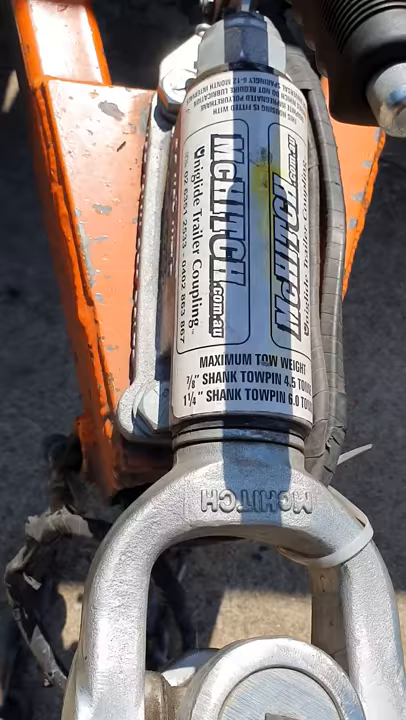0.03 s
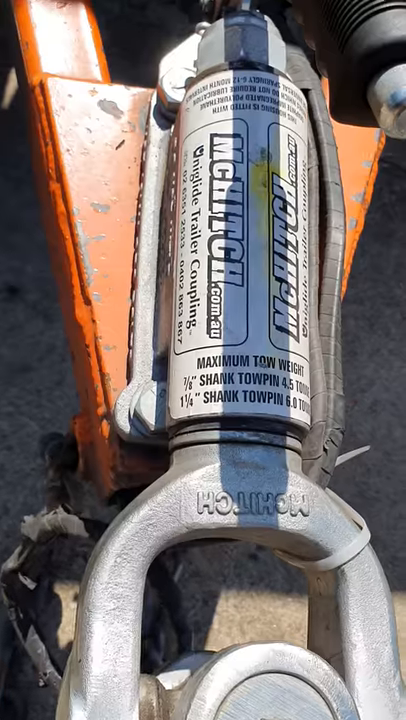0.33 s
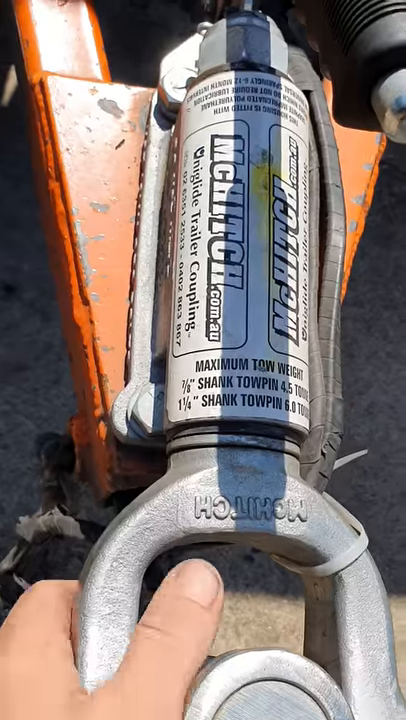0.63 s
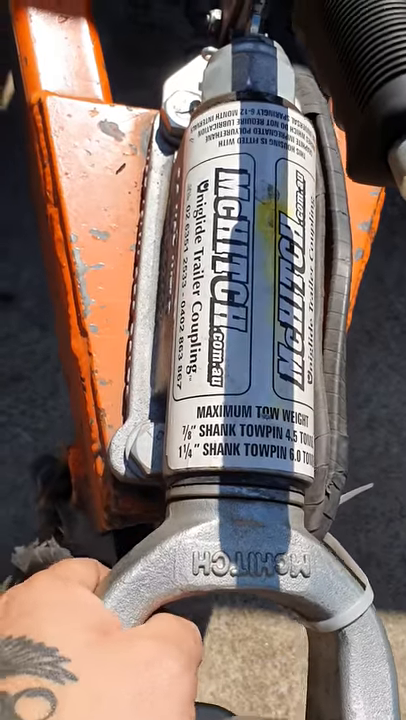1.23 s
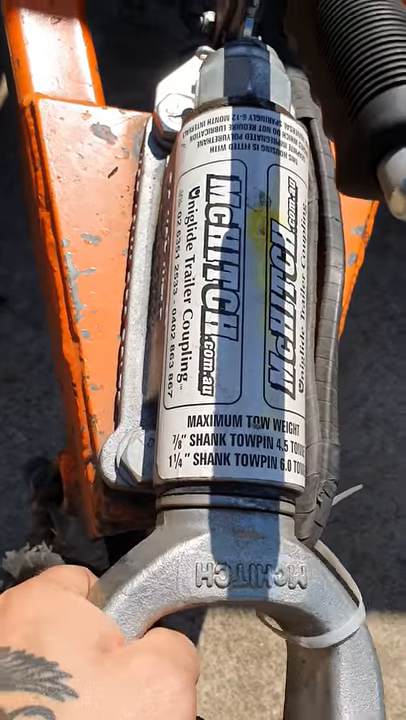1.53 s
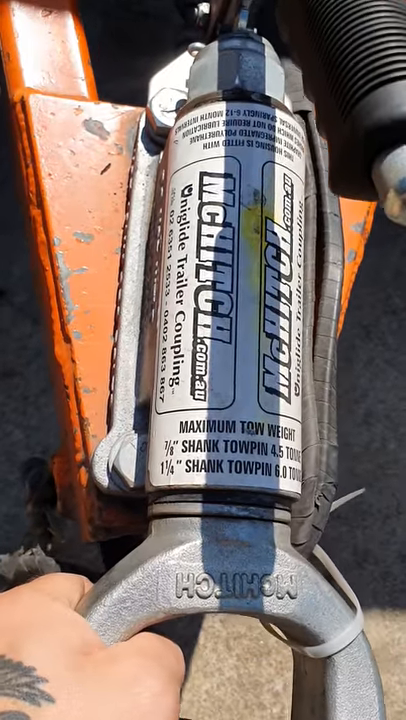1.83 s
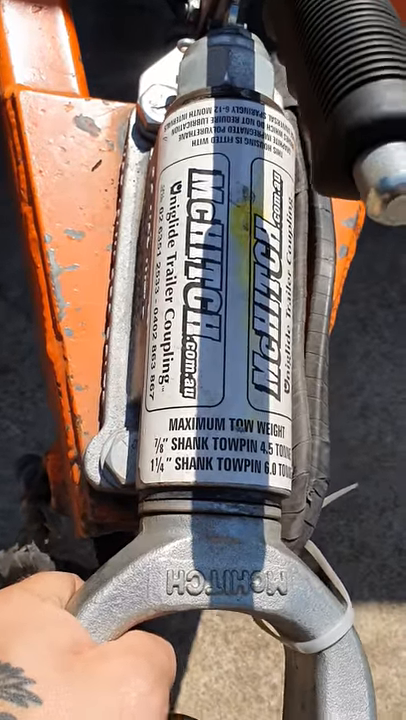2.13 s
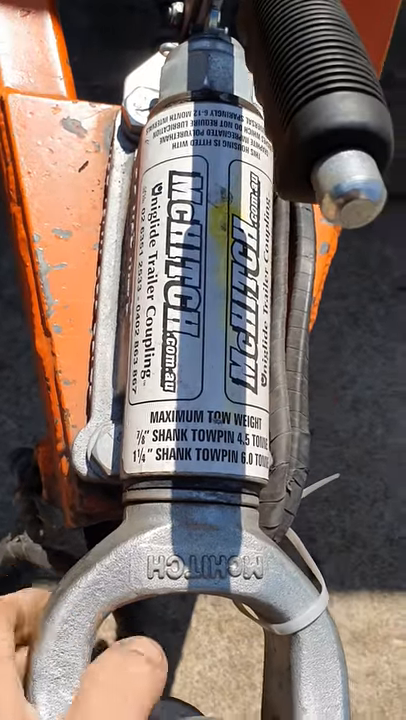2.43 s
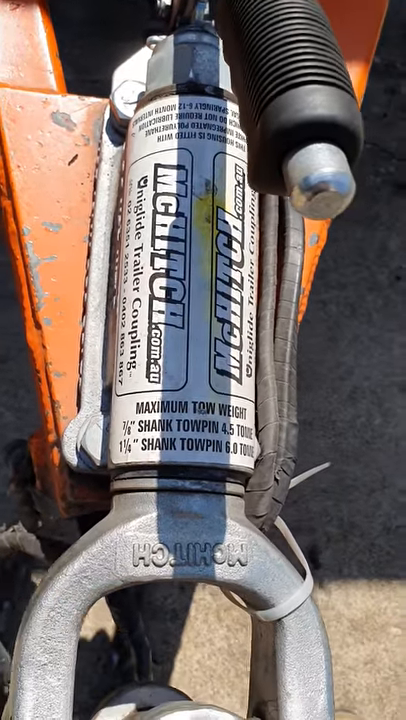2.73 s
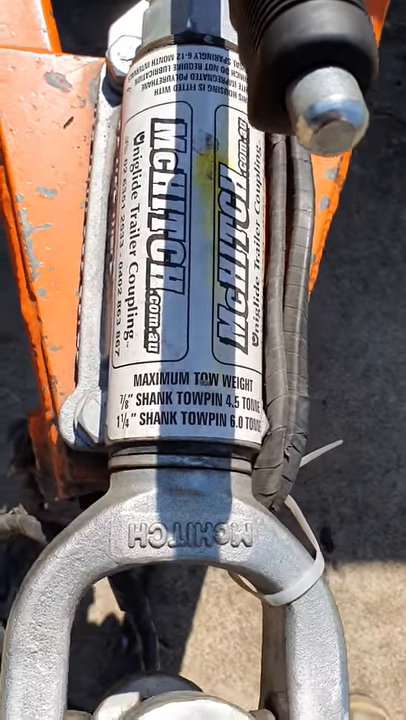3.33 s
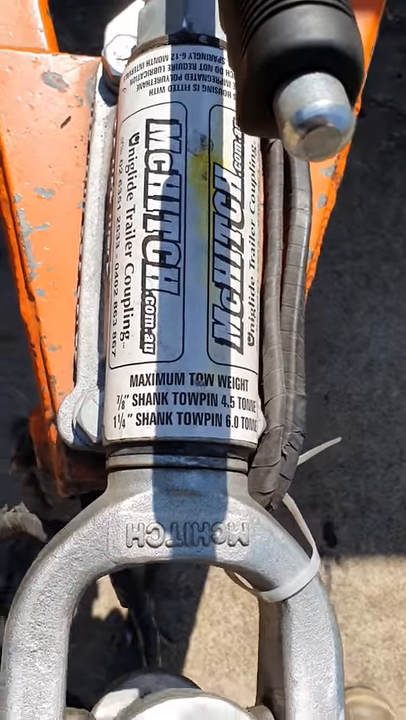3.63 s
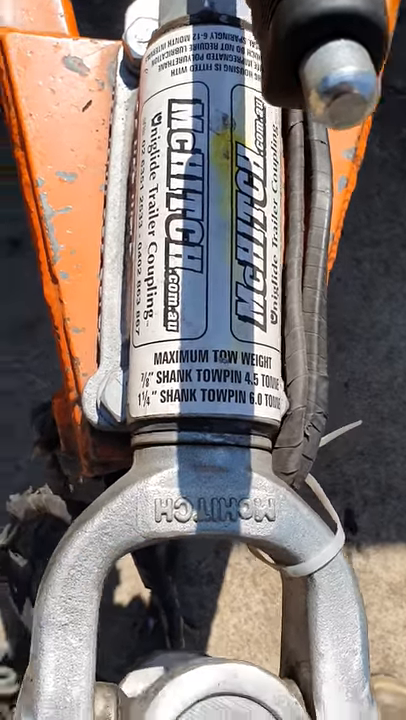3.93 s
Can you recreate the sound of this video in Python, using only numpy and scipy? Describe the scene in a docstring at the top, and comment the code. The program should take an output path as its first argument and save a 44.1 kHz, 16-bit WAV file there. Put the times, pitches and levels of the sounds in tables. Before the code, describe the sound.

A steel trailer coupling knocks three times with a dull, ringing clunk. Before that, an engine idles outdoors with buzzing loose parts while a hand softly bumps and brushes the metal close to the microphone.

```python
"""A four-cylinder engine idles outdoors: it hums and clatters, and loose parts buzz once a cycle.
Close by, a hand grips the yoke of a steel trailer coupling and slides off: soft bumps, hiss of skin.
Then the load shifts: the frame rumbles and the coupling knocks three times. Each knock is a dull
clunk as the slack closes, a spray of small contacts that ring the steel, and a ringing drawbar."""
import sys
import numpy as np
from scipy import signal
from scipy.fft import rfft, irfft
from scipy.io import wavfile
from scipy.ndimage import uniform_filter1d

SR = 44100
rng = np.random.default_rng(int(sys.argv[2]) if len(sys.argv) > 2 else 0)


def waveform_to_disk(signal):
    """Save audio, clipped to [-1, 1], as 16-bit WAV at the path in sys.argv[1]."""
    frames = np.transpose(np.atleast_2d(signal))
    scaled = np.clip(frames, -1, 1) * 32767
    samples = np.round(scaled).astype(np.int16)
    wavfile.write(sys.argv[1], SR, samples)


N = 176400
CYCLE_HZ = 6.667  # engine cycle, four firings each


def coupling():
    """The slack closes with a clunk; the joint rattles, drawbar and frame ring on."""
    # (time [s], clunk [dB], clunk [Hz], rattle [dB], rattle tilt [dB/octave], drawbar [dB])
    knocks = [(3.2242, -16.5, 670, -32, 0, -34), (3.2297, -7.5, 690, -20, -1, -21),
              (3.5234, -11.5, 690, -25, -1, -30), (3.89, -14.5, 642, -26.5, -1.5, -31.5)]  # the first two merge into one
    # (frequency [Hz], t60 [s], level [dB])
    drawbar_modes = [(160, 0.14, -5), (235, 0.3, -3), (306.5, .65, -4), (332.6, 1, -7), (509, 0.84, -15),
                     (690, 0.17, -4.5)]
    # (time [s], level [dB], frequency [Hz], width [s])
    frame_swings = [(3.30, -23.5, 310.8, 0.041), (3.575, -24.5, 243.5, .022), (3.935, -29, 254, 0.025)]
    # after-rattles as the joint settles (time [s], level [dB])
    settles = [(3.306, -47), (3.328, -44), (3.346, -47), (3.607, -44)]
    clunk_s, ring_rise_s = 0.003, 0.0065
    t, out = clock(), 0
    for start_s, clunk_db, hz, rattle_db, tilt_db, drawbar_db in knocks:
        age = t - start_s
        overtone = undb(-16) * thud(age, 1.93 * hz, clunk_s)
        thump = undb(-11) * thud(age, 0.467 * hz, 2 * clunk_s)
        clunk = thud(age, hz, clunk_s) + overtone + thump
        drawbar = -sum(undb(db) * swell(age, ring_rise_s, t60_s) * np.sin(2 * np.pi * mode_hz * age)
                       for mode_hz, t60_s, db in drawbar_modes)
        out = out + undb(clunk_db) * clunk + undb(drawbar_db) * drawbar
        out = out + undb(rattle_db) * rattle(start_s, tilt_db)
    swings = sum(undb(db) * thud(t - start_s, hz, width_s) for start_s, db, hz, width_s in frame_swings)
    return out + swings + sum(undb(db) * rattle(start_s, tilt_db=4) for start_s, db in settles)


def rattle(start_s, tilt_db):
    """Small steel contacts ring the coupling; the treble dies first, a faint tail lingers."""
    # (frequency [Hz], density [dB])
    spray_spectrum = [(200, -10), (600, 6.5), (1000, -3.5), (1400, 2), (1650, -3), (2300, 1), (3000, -3),
                      (4200, -5.5), (5500, -10.5), (8000, -14), (9700, -17), (11500, -15), (13000, -21.5),
                      (15500, -27)]
    # (frequency [Hz], t60 [s], level [dB])
    steel_modes = [(462, 0.23, 3.5), (1260, .08, -6), (1370, 0.06, -13), (1830, 0.2, 3.5),
                   (2080, 0.091, -15), (2080, 0.15, 4.5), (2220, 0.092, -2), (2480, 0.45, -17),
                   (2700, 0.061, 5.5), (3190, .15, -7), (3680, 0.25, -8), (4480, 0.11, -7),
                   (6350, 0.12, -20), (10700, 0.069, -8)]
    rise_s, split_hz, tail_corner_hz = 0.0066, 6800, 6000
    age, hz = clock() - start_s, np.fft.rfftfreq(N, 1 / SR)
    grain = np.exp(0.27 * unit(uniform_filter1d(rng.standard_normal(N), size=40)))
    tilt = undb(tilt_db * np.log2(np.maximum(hz / 2000, 1)))
    spray = rfft(reflect(noise(spray_spectrum)) * unit(grain)) * tilt
    lowpass = 1 / (1 + (hz / split_hz) ** 4)
    burst = swell(age, rise_s, t60_s=0.078)
    body = irfft(spray * lowpass) * swell(age, rise_s, t60_s=0.13)
    treble = irfft(spray * (1 - lowpass)) * burst
    tail = undb(-19) * irfft(spray / np.hypot(1, hz / tail_corner_hz)) * swell(age, rise_s, t60_s=1)
    steel = undb(-1) * ring(burst * rng.standard_normal((2, N)), steel_modes)
    return (body + treble + tail + steel) * pan(left_db=1.5)


def frame():
    """The frame rumbles as the load shifts."""
    # (time [s], level [dB])
    load_curve = [(3.0, -56), (3.122, -32.5), (3.21, -37), (3.259, -23.5), (3.36, -28), (3.46, -31),
                  (3.54, -25), (3.63, -26.5), (3.73, -29), (3.8, -30), (3.86, -35), (3.91, -29), (4.0, -32)]
    # (frequency [Hz], density [dB])
    rumble_spectrum = [(20, -25), (45, -4.5), (65, 2.5), (95, -6.5), (160, -2.5), (250, -6), (340, -6.5),
                       (420, -14.5), (560, -15), (800, -24.5), (1500, -24.5), (4000, -50)]
    time_s, db = np.array(load_curve).T
    return noise(rumble_spectrum) * undb(np.interp(clock(), time_s, db, left=-90))


def hand():
    """The hand bumps the yoke, skin brushes the steel, the palm scuffs as it lets go."""
    # (time [s], level [dB], frequency [Hz])
    bumps = [(0.854, -21, 88), (1.644, -26.5, 68.7), (1.727, -25, 63.7), (1.792, -25.5, 69),
             (2.164, -25, 71.3)]
    # (start [s], rise [s], length [s], level [dB])
    brushes = [(.415, 0.017, .27, -57.5), (2.15, 0.33, 1.15, -51.5)]
    # both (frequency [Hz], density [dB])
    brush_spectrum = [(1500, -14), (3000, 1), (4500, 4.5), (7500, -9), (9600, 4), (11000, -4.5),
                      (15500, -8)]
    scuff_spectrum = [(100, -3), (300, -2), (700, -6), (1200, -3), (2500, -12), (8000, -32)]
    scuff_at_s, scuff_width_s = 2.165, 0.053
    t, rub = clock(), 0
    thuds = sum(undb(db) * thud(t - start_s, hz, width_s=0.0086) for start_s, db, hz in bumps)
    scuff = undb(-43.5) * np.exp(-((t - scuff_at_s) / scuff_width_s) ** 2) * noise(scuff_spectrum)
    for start_s, rise_s, length_s, db in brushes:
        attack = np.clip((t - start_s) / rise_s, 0, 1)
        release = np.cos(np.pi / 2 * np.clip((t - start_s) / length_s, 0, 1))
        rub = rub + undb(db) * attack * release
    return thuds + scuff + rub * noise(brush_spectrum) * pan(left_db=-1)


def engine():
    """Firing hum, clatter that repeats each cycle, rush of fan and air; clatter and rush throb."""
    # (multiple of the firing rate, level [dB])
    harmonics = [(1, -50), (2, -1), (3, 0.5), (4, -3.5), (5, -20), (6, -16.5), (8, -5.5), (9, -9.5),
                 (13, -15.5), (19, -15.5)]
    # both (frequency [Hz], density [dB])
    clatter_spectrum = [(40, -9), (130, -6), (210, -2.5), (255, 2.5), (340, -4), (450, -8), (520, -3),
                        (680, -13), (1050, -4.5), (1300, -14.5), (1750, -5.5), (2400, -20.5), (3200, -28),
                        (6000, -38.5)]
    rush_spectrum = [(20, -6), (40, -19), (65, 3.5), (130, 2), (260, -6), (360, -3.5), (450, -8.5),
                     (750, -14), (1300, -15), (1800, -15), (2500, -12), (3000, -20), (4400, -18.5),
                     (5300, -21), (5800, -24), (9500, -29.5), (12000, -40), (15500, -63)]
    hum_db, clatter_db, rush_db, jitter_s = -43, -43, -42, 0.00014
    cycle_throb_db, firing_throb_db, throb_peak_s = 0.93, 0.5, 0.0596
    t = clock()
    late_s = jitter_s * unit(signal.resample(rng.standard_normal(64), N))
    cycles = CYCLE_HZ * (t + late_s)
    firings = 4 * cycles
    hum = sum(undb(db) * np.cos(2 * np.pi * (k * firings + rng.random())) for k, db in harmonics)
    hz = np.arange(4097) * CYCLE_HZ
    mid, side = np.exp(2j * np.pi * rng.random((2, len(hz)))) * colour(clatter_spectrum, hz)
    clatter = np.array([np.interp(cycles, np.arange(len(loop)) / len(loop), loop, period=1)
                        for loop in spread(mid, side, hz)])
    rush = reflect(noise(rush_spectrum))
    angle = 2 * np.pi * CYCLE_HZ * (t - throb_peak_s)
    throb = undb(cycle_throb_db * np.cos(angle) + firing_throb_db * np.cos(4 * angle))
    roar = undb(clatter_db) * unit(clatter) + undb(rush_db) * rush
    return undb(hum_db) * np.sqrt(2) * hum + throb * roar


def loose_parts():
    """Each engine cycle, the same run of scraping taps shakes two buzzing parts."""
    # (time in cycle [s], low part [dB], high part [dB])
    taps = [(0.034, -30, -8.5), (.05, -10, -6.5), (.064, -19, -3), (.082, -12.5, -4), (.0945, -5.5, -5),
            (.104, -36, -2.5), (.1215, -6.5, -5.5), (.145, -7.5, -7)]
    # both (frequency [Hz], t60 [s], level [dB])
    low_modes = [(878, .085, 0), (945, .05, -5), (1020, .025, -11)]
    high_modes = [(1557, 0.069, -5), (1662, 0.035, 10.5), (1761, 0.1, 6), (2020, 0.033, -34),
                  (2400, 0.029, 4), (4720, 0.042, -11), (5300, 0.037, -1), (6450, 0.053, -7)]
    # drift as the microphone moves (time [s], level [dB])
    level_curve = [(.1, -1), (1.0, 1.5), (2.2, 1), (2.998, -1.5), (4.0, -3.5)]
    jitter_s, scatter_db, scrape_decay_s, left_lag_s = 0.00008, 0.7, 0.0081, 0.00026
    tap_s, low_db, high_db = np.array(taps).T
    cycle_s = np.arange(int(N / SR * CYCLE_HZ) + 1) / CYCLE_HZ

    def buzz(modes, tap_db, scrape_db):
        late, size = rng.standard_normal((2, len(cycle_s), len(tap_s)))
        at = np.clip((cycle_s[:, None] + tap_s + jitter_s * late) * SR, 0, N).astype(int)
        hits = np.bincount(at.ravel(), undb(tap_db + scatter_db * size).ravel(), N + 1)[:N]
        contact = signal.lfilter([1], [1, -np.exp(-1 / (scrape_decay_s * SR))], hits)
        scrape = contact * rng.standard_normal((2, N))
        stereo_hits = np.array([np.roll(hits, int(left_lag_s * SR)), hits])
        return unit(ring(unit(stereo_hits) + undb(scrape_db) * unit(scrape), modes))

    low = undb(-49) * buzz(low_modes, low_db, scrape_db=-15)
    high = undb(-48) * buzz(high_modes, high_db, scrape_db=0)
    return (low + high) * undb(np.interp(clock(), *np.array(level_curve).T))


def reflect(x):
    """Nearby steel and ground comb the sound, differently on each side; rms 1."""
    t = clock()[:2048]
    echoes = rng.standard_normal((2, len(t))) * fade(t, t60_s=0.035)
    echoes = undb(-4) * echoes / np.sqrt(np.sum(echoes[0] ** 2))
    response = (t == 0) + signal.sosfilt(signal.butter(2, 900, "high", fs=SR, output="sos"), echoes)
    return unit(signal.fftconvolve(x, response, axes=1)[:, :N])


def ring(force, modes):
    """Drive decaying modes; their joint response has unit energy."""
    t = clock()[:SR // 2]
    response = sum(undb(db) * fade(t, t60_s) * np.sin(2 * np.pi * hz * t) for hz, t60_s, db in modes)
    return signal.fftconvolve(force, response[None] / np.sqrt(np.sum(response ** 2)), axes=1)[:, :N]


def thud(age, hz, width_s):
    """Heavily damped swing; the envelope peaks at 1 after width_s."""
    u = np.maximum(age, 0) / width_s
    return -u * np.exp((1 - u ** 2) / 2) * np.sin(2 * np.pi * hz * age)


def swell(age, rise_s, t60_s):
    """Linear attack, exponential decay."""
    return np.clip(age / rise_s, 0, 1) * fade(np.maximum(age - rise_s, 0), t60_s)


def fade(age, t60_s):
    """Exponential decay from age 0."""
    return (age >= 0) * np.exp(-np.log(1000) * np.maximum(age, 0) / t60_s)


def noise(spectrum):
    """Coloured stereo noise, rms 1."""
    hz = np.fft.rfftfreq(N, 1 / SR)
    mid, side = rfft(rng.standard_normal((2, N))) * colour(spectrum, hz)
    return unit(spread(mid, side, hz))


def spread(mid, side, hz):
    """Left and right from mid and side spectra; narrow in the bass."""
    # (frequency [Hz], side minus mid [dB])
    width_curve = [(60, -7), (180, -10), (300, -5), (450, -2), (800, 1), (1300, 5.5), (2000, -8),
                   (3200, 2.5), (15000, -1)]
    width = colour(width_curve, hz)
    return irfft((mid + np.array([[1], [-1]]) * width * side) / np.sqrt(1 + width ** 2))


def colour(curve, hz):
    """Gain at hz of a (frequency [Hz], level [dB]) curve."""
    knots_hz, db = np.array(curve).T
    return undb(np.interp(np.log(hz + 1e-3), np.log(knots_hz), db))


def pan(left_db):
    """Stereo gains, left over right by left_db."""
    return undb(np.array([[left_db], [-left_db]]) / 2)


def undb(db):
    """Decibels to gain."""
    return 10 ** (np.asarray(db) / 20)


def unit(x):
    """Scale to rms 1."""
    return x / np.sqrt(np.mean(x ** 2) + 1e-20)


def clock():
    """Sample times [s]."""
    return np.arange(N) / SR


def scene():
    """Engine, coupling and hand together."""
    return engine() + loose_parts() + coupling() + frame() + hand()


def record(dry):
    """The microphone opens after a moment; its left side is brighter, the top is cut."""
    open_s, top_hz = 0.105, 15550
    hz = np.fft.rfftfreq(N, 1 / SR)
    left_gain = colour([(1000, -0.5), (4000, -0.5), (9000, 0.5), (13000, 3)], hz) ** 0.5
    heard = irfft(rfft(dry) * np.array([left_gain, 1 / left_gain])) * (clock() >= open_s)
    return signal.sosfilt(signal.ellip(10, 0.2, 80, top_hz, fs=SR, output="sos"), heard)


dry = scene()
out = record(dry)
waveform_to_disk(out)
```